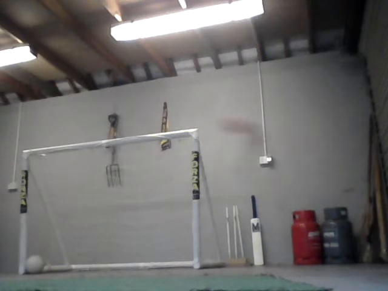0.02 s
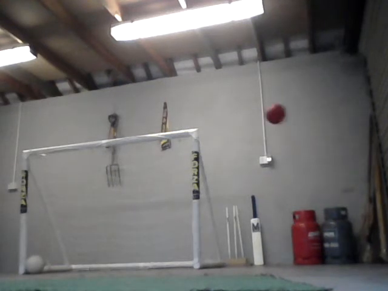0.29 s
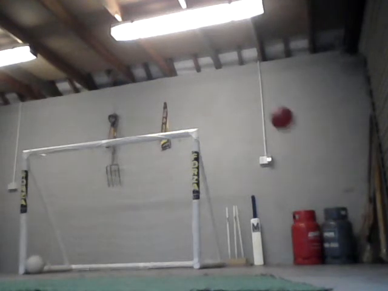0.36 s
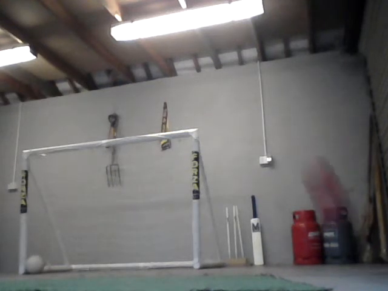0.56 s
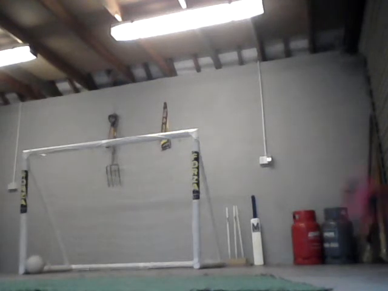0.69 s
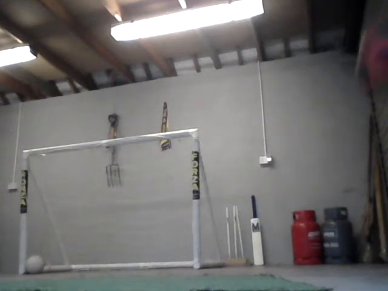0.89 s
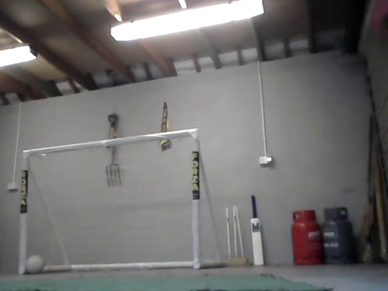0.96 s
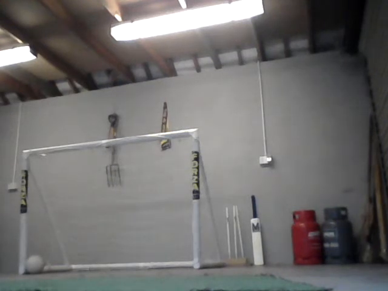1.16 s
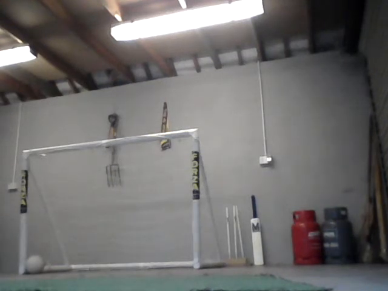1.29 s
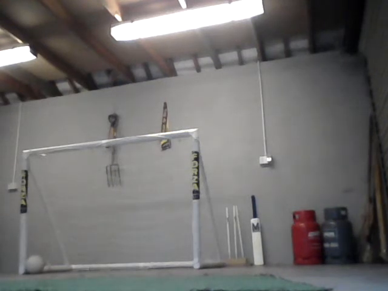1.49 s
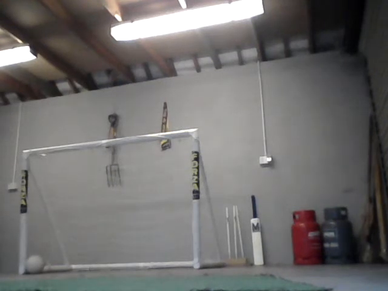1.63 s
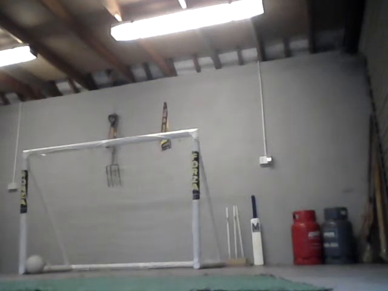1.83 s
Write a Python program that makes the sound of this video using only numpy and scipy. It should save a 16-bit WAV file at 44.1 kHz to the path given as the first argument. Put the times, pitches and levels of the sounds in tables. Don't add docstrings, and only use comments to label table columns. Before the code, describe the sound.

A light hollow ball hits a goal crossbar with a sharp ringing smack, then slaps the floor and later the wall; bare garage echoes, faint shoe scuffs near the end, small camera microphone.

```python
import sys
import numpy as np
from scipy import signal
from scipy.fft import rfft, irfft
from scipy.io import wavfile
from scipy.ndimage import uniform_filter1d

SR = 44100
rng = np.random.default_rng(int(sys.argv[2]) if len(sys.argv) > 2 else 0)


def amplitude_ratio(level_db):
    exponent = np.asarray(level_db, float) / 20
    return 10 ** exponent


def store_pcm(level_fs):
    pcm = np.round(np.clip(level_fs, -1, 1) * 32767).astype(np.int16)
    wavfile.write(sys.argv[1], SR, np.atleast_2d(pcm).T)


N = 81585
LEAD = 8192


def evened(x):
    return x / np.sqrt(np.mean(x ** 2) + 1e-20)


def read(points, hz):
    f, value = np.transpose(points)
    return np.interp(np.log(hz + 1), np.log(f + 1), value)


def add(mix, s, sound):
    part = mix[LEAD + round(s * SR):][:len(sound)]
    part += sound[:len(part)]


def coloured(x, points):
    log_gain = np.log(amplitude_ratio(read(points, abs(np.fft.fftfreq(8192, 1 / SR)))))
    spectrum = np.exp(log_gain - 1j * signal.hilbert(log_gain).imag)
    taps = np.fft.ifft(spectrum).real[:4096]
    return signal.fftconvolve(x, taps)[:len(x)]


def rings(modes, rise_s):
    waver, waver_s = 0.6, 0.018
    width = round(waver_s * SR)
    t = np.arange(SR) / SR
    total = np.zeros(SR)
    for hz, db, t60 in modes:
        drift = rng.standard_normal((SR, 2)) @ [1, 1j]
        drift = uniform_filter1d(uniform_filter1d(drift, width), width)
        wobble = 1 + waver * np.sqrt(waver_s * SR) * drift * np.minimum(t / waver_s, 1)
        partial = (wobble * np.exp(2j * np.pi * (hz * t + rng.random()))).real
        total += amplitude_ratio(db - 60 * t / t60) * partial
    return (1 - np.exp(-t / rise_s)) * total


# (frequency [Hz], t60 [s])
GARAGE_DECAY = [(100, .74), (260, 0.54), (700, 0.69), (1840, 0.65), (4850, 0.62), (7000, 0.49),
                (9000, 0.32), (14000, 0.46)]


def tail(points, build_s):
    noise = evened(coloured(rng.standard_normal(SR), points))
    hz, t, z = signal.stft(noise, SR, nperseg=256)
    t60 = np.clip(read(GARAGE_DECAY, hz), 0.1, 3)[:, None]
    out = signal.istft(z * amplitude_ratio(-60 * t / t60), SR, nperseg=256)[1][:SR]
    return out * (1 - np.exp(-np.arange(SR) / SR / build_s))


# (frequency [Hz], level [dB])
HUM_COLOUR = [(18, -13.5), (30, -4), (113, -1.5), (400, -13.5), (1140, -19), (1790, -38), (2990, -23.5),
              (5000, -28.5)]


def hum():
    return amplitude_ratio(-67.5) * evened(coloured(rng.standard_normal(N + LEAD), HUM_COLOUR))


# (time [s], frequency [Hz], level [dB], t60 [s])
SQUEAKS = [
    (1.255, 3050, -76, .6),
    (1.333, 2050, -62, .4),
    (1.711, 5350, -47, .04),
]


def squeaks(mix):
    for s, hz, db, t60 in SQUEAKS:
        add(mix, s, rings([(hz, db, t60), (hz + 90, db, t60)], 0.004))


def scuff(colour, rise_s, hold_s, dry_db, tail_db):
    clicks_per_s, spread_db, fall_s = 7000, 2.5, 0.0051
    t = np.arange(SR) / SR
    struck = rng.random(SR) < clicks_per_s / SR
    size = amplitude_ratio(spread_db * np.minimum(rng.exponential(1, SR), 4))
    grit = struck * size * rng.standard_normal(SR)
    stroke = np.minimum(t / rise_s, 1) ** 2 * np.exp(-np.maximum(t - rise_s - hold_s, 0) / fall_s)
    direct = amplitude_ratio(dry_db) * stroke * evened(coloured(grit, colour))
    return direct + amplitude_ratio(tail_db) * tail(colour, rise_s + 0.5 * hold_s)


# (start [s], rise [s], hold [s], dry level [dB], tail level [dB])
TOE_SLIDES = [
    (1.313, 0.0012, 0.0027, -61, -73.5),
    (1.324, .004, 0.015, -37, -36),
    (1.713, 0.00073, .006, -41, -50),
    (1.724, 0.0016, 0.0038, -53, -53),
    (1.786, 0.008, .006, -29.5, -37),
    (1.768, 0.011, .002, -35, -38.5),
]
SOLE_DRAGS = [
    (1.332, 0.005, .04, -57, -46),
    (1.779, 0.0059, .04, -46, -40.5),
]
# (frequency [Hz], level [dB])
TOE_COLOUR = [(300, -53), (2500, -27), (4000, -5.5), (5500, 2.5), (6500, -0.5), (9000, 2)]
SOLE_COLOUR = [(300, -35), (1000, -10), (1800, -14.5), (2100, -6), (2600, -4), (3700, 3.5), (4700, -0.5),
               (6000, -14)]


def shoes(mix):
    for s, *stroke in TOE_SLIDES:
        add(mix, s, scuff(TOE_COLOUR, *stroke))
    for s, *stroke in SOLE_DRAGS:
        add(mix, s, scuff(SOLE_COLOUR, *stroke))


# (frequency [Hz], level [dB], t60 [s])
FRAME_RINGS = [(434.3, 6.5, 0.21), (410.7, -16.5, 0.6), (519.6, -15, 0.57), (714.5, -12, .4),
               (975, -12, .2), (1334, -16, 0.45), (1600, -14.5, 0.084)]


def goal_frame():
    return amplitude_ratio(-12.5) * rings(FRAME_RINGS, 0.075)


# (delay [s], level [dB])
BAR_ECHOES = [(.0007, -3), (.0015, -4.5), (.0026, 0), (.0031, -10.5), (.0041, -3), (.0068, -3.5),
              (.0145, -7.5)]
FLOOR_ECHOES = [(.0011, -16), (.0018, -11), (.0022, -6), (.0026, -9), (.0031, -9), (.0034, -9), (.006, -15)]
WALL_ECHOES = [(.0006, -14), (.0014, -7.5), (.0024, -22), (.0032, -12), (0.012, -20)]
ECHOES = (FLOOR_ECHOES, BAR_ECHOES, FLOOR_ECHOES, WALL_ECHOES)
CONTACT_S = (.0001, 0.000025, 0.000025, 0.000024)


def slap(k):
    paths = np.zeros(SR)
    paths[0] = 1
    for j, (delay_s, db) in enumerate(ECHOES[k]):
        paths[round(delay_s * SR)] = -(-1) ** j * amplitude_ratio(db)
    u = np.arange(400) / SR / CONTACT_S[k]
    pulse = -u * (2.6 - u) * np.exp(-u)
    return signal.fftconvolve(paths, pulse)[:SR]


# (frequency [Hz], level [dB], t60 [s])
BAR_RINGS = [(189.4, -7, .15), (284, -13.5, 0.32), (477.4, -6, 0.16), (719.4, 1, 0.037), (734, -6.5, 0.11),
             (1420, -15.5, 0.12), (1463, -6, 0.21), (4600, -9.5, .04)]
FLOOR_RINGS = [(186.5, -2, 0.062), (259, -2.5, 0.11), (445, -9.5, 0.072), (329.5, -16, .2),
               (564, -15, 0.099), (630, -7.5, 0.13), (790, -4.5, .04), (855, -11, 0.018), (2103, 3, 0.023),
               (4990, 11, 0.0088)]
WALL_RINGS = [(202, -9.5, 0.063), (437, 1, 0.027), (805, 16, 0.013), (910, -14, .02), (2297, 8.5, 0.014),
              (4534, -8, 0.0087), (6600, 15.5, 0.0081)]
BODIES = (FLOOR_RINGS, BAR_RINGS, FLOOR_RINGS, WALL_RINGS)


def body(k):
    return rings(BODIES[k], 0.0015)


# (frequency [Hz], level [dB])
KICK_COLOUR = [(88, -22), (150, -6.5), (680, -15), (996, -26.5), (1690, -25.5), (2910, -31.5), (5000, -27),
               (9000, -37.5)]
BAR_COLOUR = [(88, -29.5), (150, -17), (346, -13.5), (520, -10.5), (885, -21), (1420, -17), (3130, -20.5),
              (5000, -19), (9000, -21)]
FLOOR_COLOUR = [(88, -25), (150, -10), (438, -1.5), (764, -6), (1000, -11), (1930, -10.5), (3840, -11),
                (5000, -13.5), (9000, -10)]
WALL_COLOUR = [(88, -22), (150, -9.5), (478, -4.5), (800, -11), (1370, -15), (1840, -18.5), (2580, -12.5),
               (5000, -17.5), (9000, -11.5)]
COLOURS = (KICK_COLOUR, BAR_COLOUR, FLOOR_COLOUR, WALL_COLOUR)
BUILD_S = (.01, 0.0044, 0.0031, 0.004)


def garage(k):
    return tail(COLOURS[k], BUILD_S[k])


def low_rise(t):
    return 1 - np.exp(-t / 0.0066)


# (frequency [Hz], t60 [s], kick level [dB], bar level [dB], floor level [dB], wall level [dB])
ROOM_MODES = [(48.3, 0.82, -7.5, -23, -13, -15), (64.55, .9, -17, -21.5, -12, -17),
              (74.8, 0.79, -8.5, -13, -7, -1.5), (81, 0.48, -9, -17, -4, -18),
              (87.05, 0.61, -7.5, -8, -4, -8.5), (96.3, 0.31, -23.5, 0.5, -2.5, -23),
              (108, 0.34, -12.5, -8, -5.5, -10.5), (130, 0.35, 3.5, -17, -16, -17),
              (141, .5, -1, -7.5, -16, -25), (190.1, 0.49, -17, -8.5, -11, -11)]


def boom(k):
    t = np.arange(SR) / SR
    total = np.zeros(SR)
    for hz, t60, *levels_db in ROOM_MODES:
        total += amplitude_ratio(levels_db[k] - 60 * t / t60) * np.sin(2 * np.pi * hz * t)
    return low_rise(t) * total


# (frequency [Hz], level [dB], t60 [s])
THUMPS = [
    (90, -66.5, 0.19),
    (96, -13, 0.13),
    (88.5, -19.5, 0.13),
    (81.7, -25, 0.19),
]


def thump(k):
    t = np.arange(SR) / SR
    hz, db, t60 = THUMPS[k]
    return low_rise(t) ** 2 * amplitude_ratio(db - 60 * t / t60) * np.sin(2 * np.pi * hz * t)


# (time [s], slap level [dB], body level [dB], tail level [dB], boom level [dB])
BLOWS = [
    (-.06, -60, -56, -44, -45),
    (0.2108, -1, -14.5, -15.5, -22.5),
    (.7848, 2, -22, -23, -35),
    (1.5653, 2.5, -23.5, -27, -34),
]


def blow(k):
    _, slap_db, body_db, tail_db, boom_db = BLOWS[k]
    near = amplitude_ratio(slap_db + 3) * slap(k) + amplitude_ratio(body_db) * body(k) + thump(k)
    room = amplitude_ratio(tail_db) * garage(k) + amplitude_ratio(boom_db) * boom(k)
    return near + room


def scene():
    mix = hum()
    squeaks(mix)
    shoes(mix)
    add(mix, BLOWS[1][0] + 0.018, goal_frame())
    for k in range(len(BLOWS)):
        add(mix, BLOWS[k][0], blow(k))
    return mix[None, LEAD:]


def band_limit(x):
    return signal.sosfilt(signal.butter(12, 15500, fs=SR, output="sos"), x)


# (frequency [Hz], level [dB])
MIC = [(25, -2), (60, 3.5), (4000, 0), (6300, 8.5), (9000, 1), (15500, -22)]
TOP_CUT = [(6500, 1.5), (6900, -6.5), (7400, -10), (8200, -19.5)]


def record(dry):
    x = coloured(dry[0], MIC)
    cut = amplitude_ratio(read(TOP_CUT, np.fft.rfftfreq(2 * N, 1 / SR)))
    x = irfft(rfft(x, 2 * N) * cut, 2 * N)[:N]

    smear_s = 0.0165
    t = np.arange(round(smear_s * SR)) / SR
    smear = amplitude_ratio(-63) * np.cos(2 * np.pi * 6700 * t)
    smear += amplitude_ratio(-82) * np.sin(2 * np.pi * 30 * t)
    smear += amplitude_ratio(-77) * rng.standard_normal(len(t))
    x = x + np.append(signal.fftconvolve(x, smear)[len(t):], 0)

    knee, ceiling = 0.72, 0.98
    room = ceiling - knee
    over = np.maximum(abs(x) - knee, 0)
    x = x - np.sign(x) * (over - room * np.tanh(over / room))
    x = x + amplitude_ratio(-83.5) * rng.standard_normal(N)
    return band_limit(x[None])


dry = scene()
out = record(dry)
store_pcm(out)
```